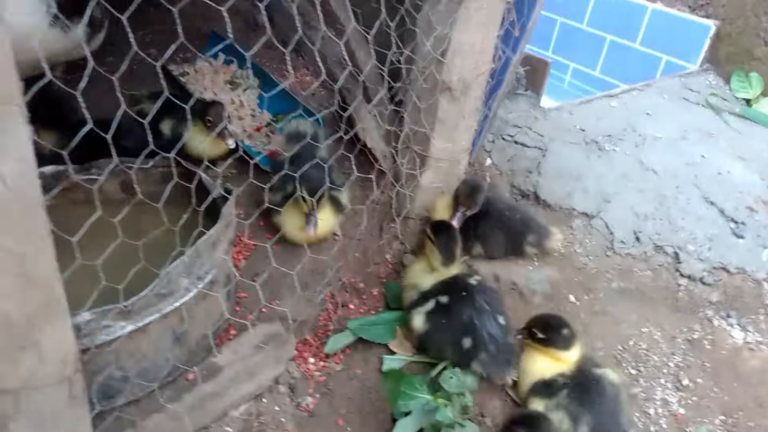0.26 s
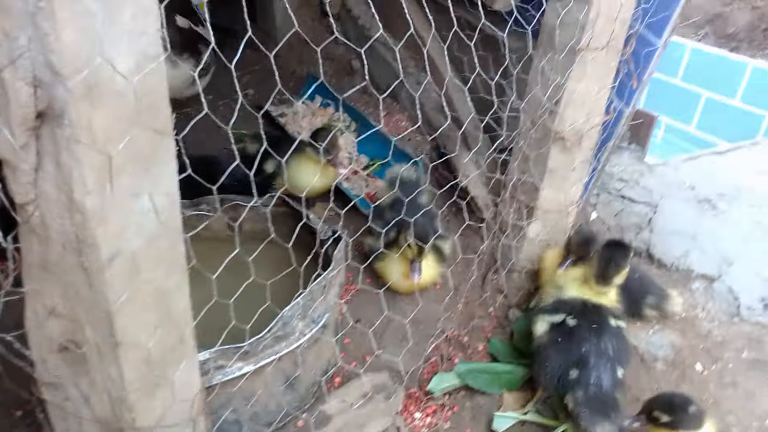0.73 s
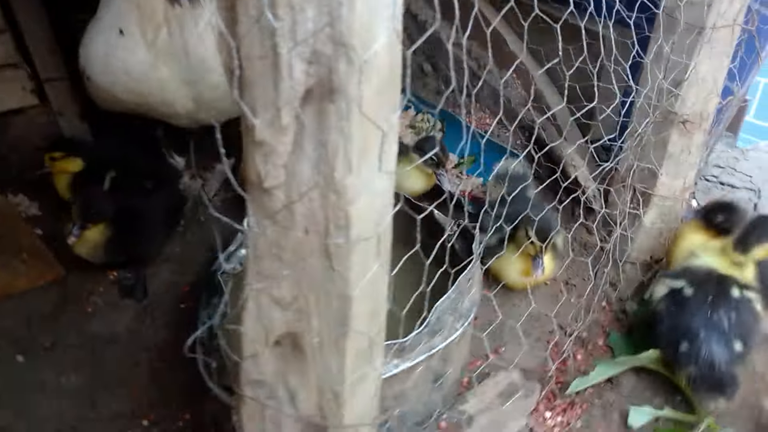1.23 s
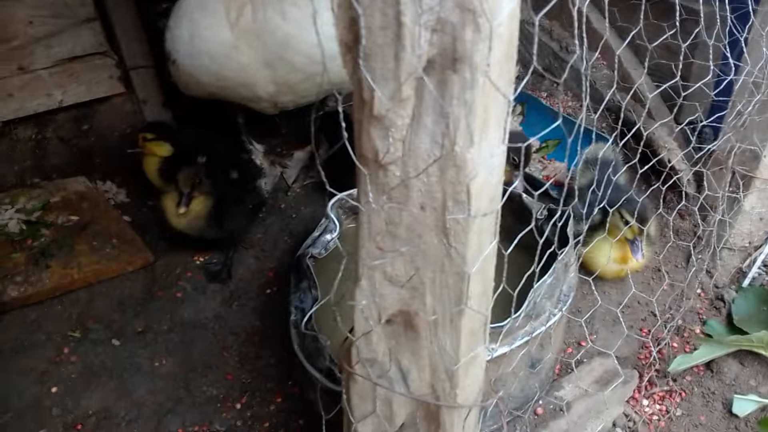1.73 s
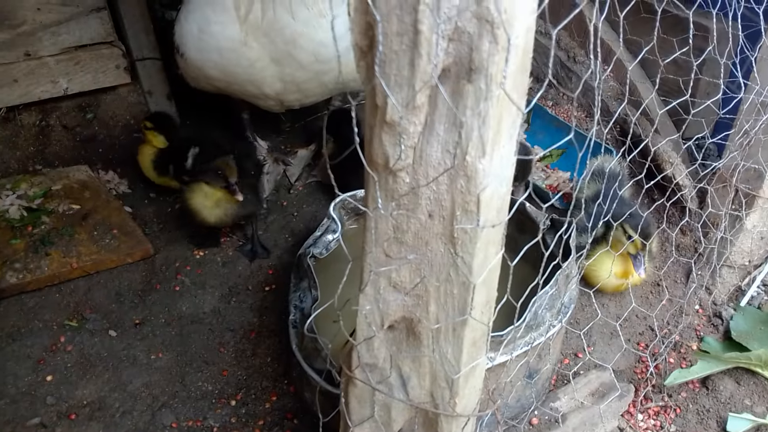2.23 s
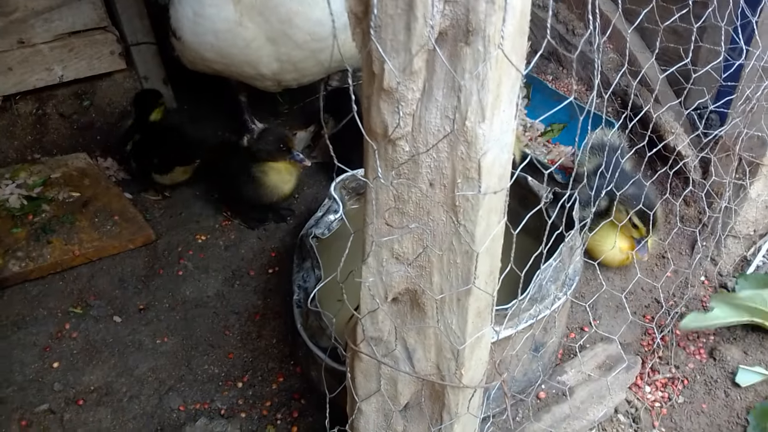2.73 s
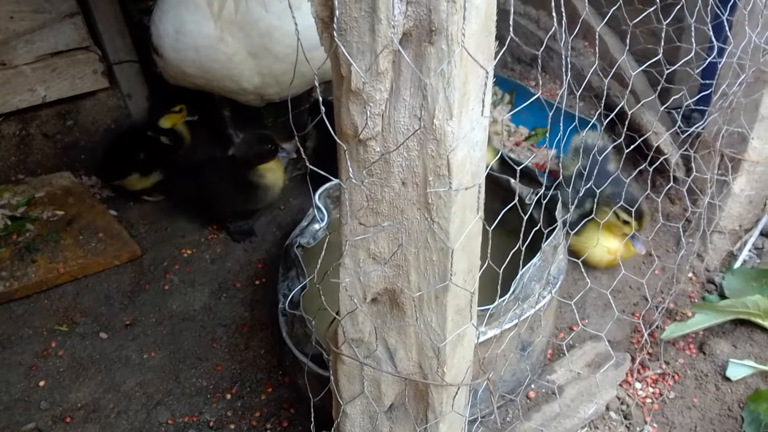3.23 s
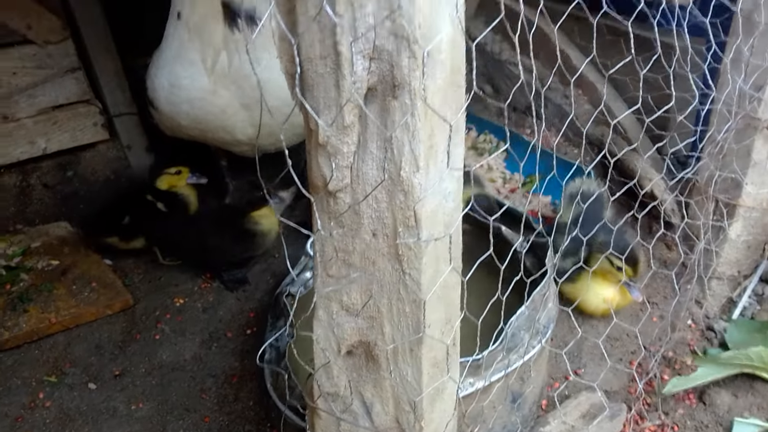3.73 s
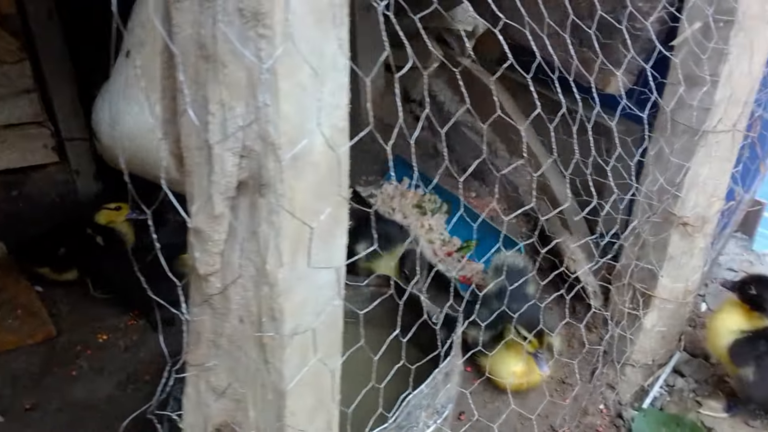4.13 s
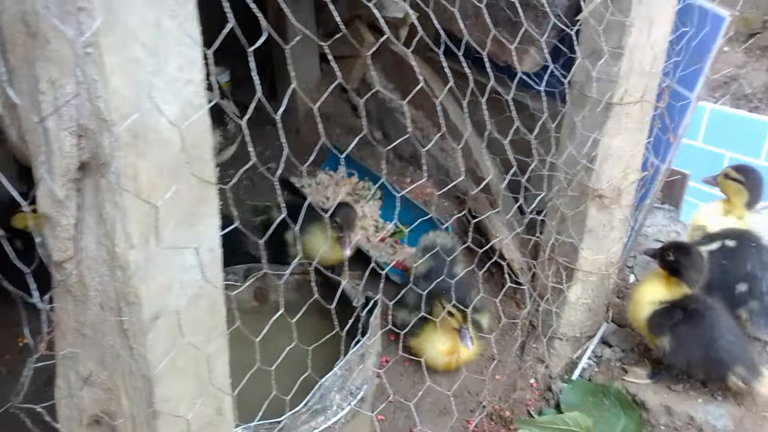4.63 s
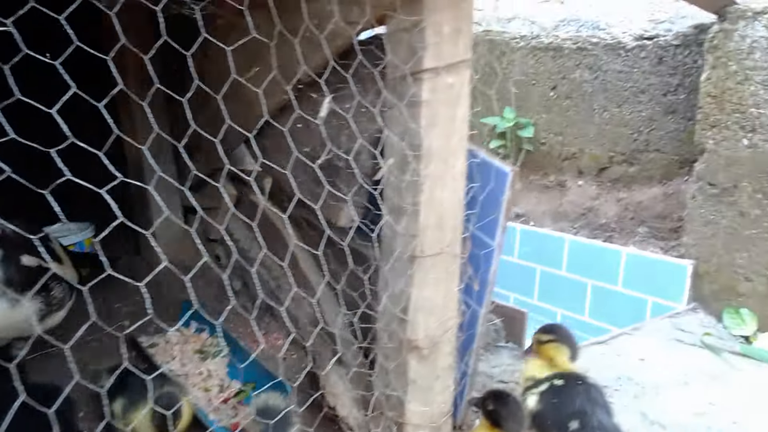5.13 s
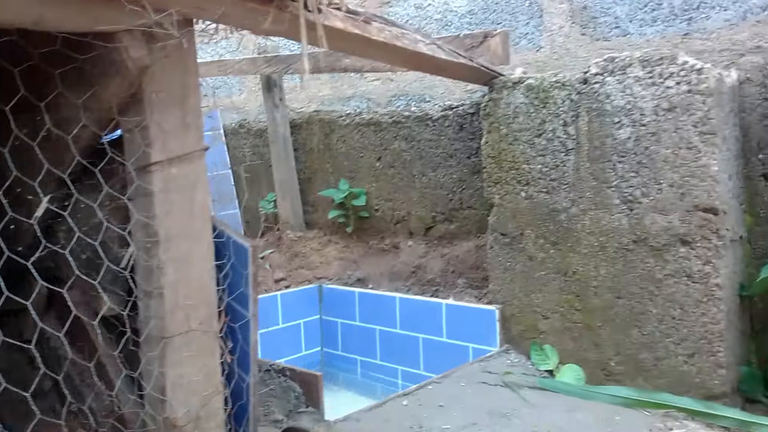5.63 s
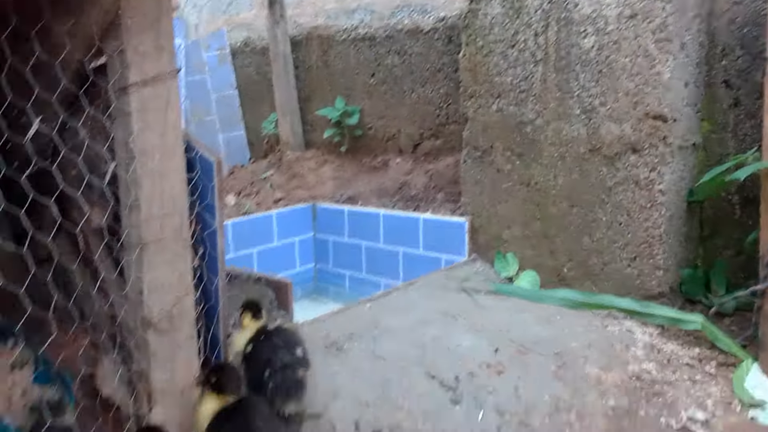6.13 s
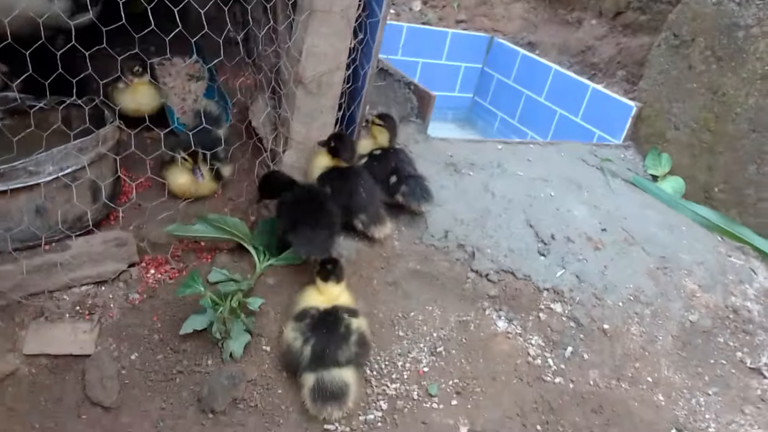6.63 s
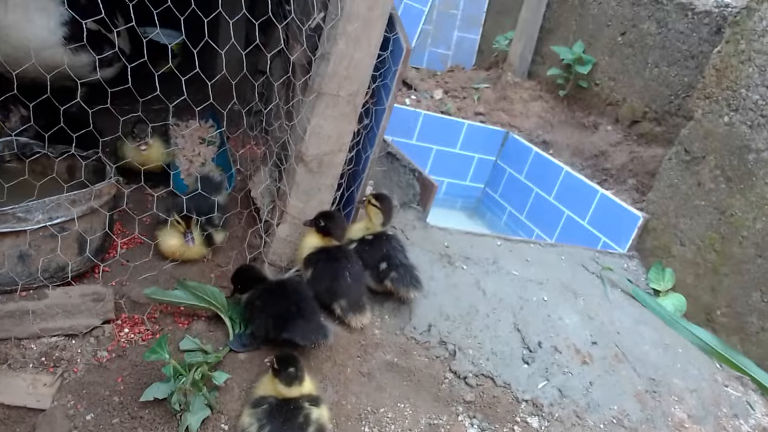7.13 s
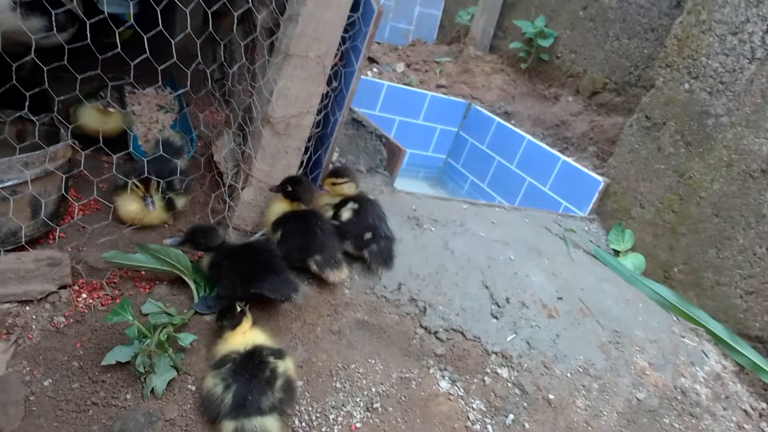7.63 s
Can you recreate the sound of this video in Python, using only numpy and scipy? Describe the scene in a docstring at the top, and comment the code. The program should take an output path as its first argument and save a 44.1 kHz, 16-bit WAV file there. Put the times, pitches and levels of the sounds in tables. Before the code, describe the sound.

Loud grainy handling rubs and snapping clicks come in bursts, with tiny duckling peeps, a rapid faint insect trill and one soft low cluck between.

```python
"""Ducklings and a shifting grip

Ducklings peep faintly (gliding whistles) in a backyard pen while an insect (ringing noise pulses)
chirps on a nearly steady beat, and once a low cluck sounds close by. The hand holding the phone shifts
its grip: skin drags over the case (grainy noise) and the case ticks (short rings).
Fingers near the microphone port lift the hiss around its resonance."""
import sys
import numpy as np
from scipy import signal
from scipy.fft import rfft, irfft, next_fast_len
from scipy.io import wavfile
from scipy.ndimage import uniform_filter1d, map_coordinates

SR = 44100
rng = np.random.default_rng(int(sys.argv[2]) if len(sys.argv) > 2 else 0)


def unload_wav(signal):
    """Save mono or channel-first audio to the path in sys.argv[1] as 16-bit WAV at rate SR, clipped to [-1, 1]."""
    wavfile.write(
        sys.argv[1],
        SR,
        np.round(np.clip(np.atleast_2d(signal).T, -1, 1) * 32767).astype(np.int16),
    )


N = 347508

# Colour of the yard noise: pitch_hz, relative_level_db
YARD_COLOUR = [(15, -40), (45, -0.5), (110, -6.5), (167, -29.5), (230, -10), (400, -11.5), (700, -16.5),
               (2000, -21.5), (4500, -23.5), (7300, -24.5), (9400, -22), (10400, -23.5), (11500, -16),
               (13600, -25), (15800, -25), (16500, -42.5)]
YARD_DB = -71.5

# Dry rustles in the pen: start_s, hold_s, level_db
RUSTLES = [(2.78, 0.039, -64), (3.93, 0.05, -65), (5.26, 0.12, -74)]
# Level of the continuous mid-range rustling hiss, strongest at first and fading late: time_s, level_db
RUSTLING_HISS = [(.2, -52.5), (.7, -63.5), (.85, -70), (1.95, -68), (2.1, -81.5), (6.3, -76.5),
                 (6.6, -92.5), (7.88, -96.5)]
# Colour of the rustles and the rustling hiss: pitch_hz, relative_level_db
LITTER_COLOUR = [(1200, -29), (2200, -4), (3500, -10), (5500, -1), (7000, 2), (9000, -25)]
RUSTLE_RISE, RUSTLE_FALL = [340], [570]  # dB per second

# Something hollow drags in the pen (one row): start_s, hold_s, level_db
SCRAPE = (5.275, 0.12, -66.5)
# Resonances of the hollow object: pitch_hz, width_hz, level_db
HOLLOW = [(742, 90, -2), (1350, 150, -4), (2185, 210, -1), (5400, 390, -6.5)]

# Loudness of the insect: time_s, level_db
INSECT_LEVEL = [(1.3, -81), (2.0, -71.5), (3.2, -71), (5.6, -72), (6.5, -74), (7.2, -95)]
# Beat of the insect: time_s, chirps_so_far
INSECT_BEAT = [(0, -.07), (3.2, 35.34), (5.6, 61.9), (6.45, 71.0), (7.9, 87.05)]
# Wing strokes in one chirp: place_cycles, width_cycles, level_db
STROKES = [(-.16, 0.06, -5), (0.04, 0.07, 1)]
# Resonances of the wing: pitch_hz, width_hz, level_db
WING = [(5800, 700, -1), (6250, 600, 0)]

# Peeps: start_s, length_s, start_pitch_hz, glide_pitch_hz, level_db
PEEPS = [(1.967, 0.037, 3080, 2380, -62), (2.079, 0.056, 3700, 2400, -56), (2.5, 0.032, 2750, 2450, -68),
         (2.569, 0.038, 2640, 3200, -68), (3.349, 0.028, 2900, 2280, -66), (3.474, 0.032, 3250, 2380, -63),
         (3.529, 0.032, 2600, 2100, -71), (3.66, 0.039, 2950, 2100, -67), (3.777, 0.025, 3100, 2550, -74),
         (3.839, 0.03, 2550, 3100, -66), (3.981, 0.036, 3500, 2400, -60), (4.39, 0.03, 2450, 2600, -73),
         (4.428, 0.04, 2700, 3200, -69), (4.479, 0.05, 2680, 3150, -61), (4.552, 0.045, 2650, 3450, -63),
         (4.626, 0.044, 2780, 3600, -61)]
# Swell inside each peep, added to its level: share_of_length, change_db
PEEP_SWELL = [(0, -7), (.45, 1), (1, -8)]
# A rising peep climbs for this share of its length, then drops to this part of its top pitch
RISE_SHARE, DROP_TO = .62, .76
FULL_S = .034  # a rising peep this short or shorter (seconds) stops before its drop

# Soft low cluck close by: time_s, pitch_hz, level_db
CLUCK = [(4.825, 344.3, -54), (4.85, 447.6, -55), (4.869, 402, -32.5), (4.884, 303, -48), (4.919, 242, -51),
         (4.94, 250, -65.5)]

# The hand sweeps along the case: start_s, hold_s, level_db
SWEEPS = [(7.672, 0.03, -64.5), (7.805, 0.0309, -53.5), (7.85, .03, -48)]
# Colour of the sweeping rush: pitch_hz, relative_level_db
SWEEP_COLOUR = [(1300, -8), (2050, -1), (2550, -8), (3300, -1), (5200, -8.5), (7000, -24.5)]

# The hand resting on the case between rubs: time_s, palm_drag_db, port_hiss_db
HAND = [(0, -59, -58), (.45, -53, -60.5), (.66, -61, -52.5), (.84, -67, -62), (1.2, -58.5, -66.5),
        (1.24, -46, -30.5), (1.45, -63.5, -48), (1.58, -72.5, -68.5), (1.85, -73.5, -66.5),
        (2.15, -91, -80), (4.05, -86, -86), (4.2, -64, -58), (4.45, -101, -72), (4.75, -77, -79),
        (4.93, -63, -77), (5.1, -84.5, -89), (5.81, -104, -91), (5.85, -46, -82), (5.9, -56, -54.5),
        (6.05, -54.5, -55.5), (6.3, -72, -64), (6.5, -85.5, -67.5), (7.48, -79.5, -71.5),
        (7.88, -41.5, -74)]
FINGER_REST_DB = -5  # fingers compared with the palm between rubs
# Rubs of skin on the case: start_s, hold_s, palm_db, finger_db, scratch_db
RUBS = [(.033, .08, -44.5, -45, -35), (.16, 0.022, -48, -46, -67.5), (.179, 0.007, -51, -67, -26),
        (.192, 0.0041, -60, -66, -30), (.21, 0.11, -48, -52.5, -57.5), (.244, 0.0074, -36.5, -54.5, -54.5),
        (.312, 0.028, -38.5, -45.5, -55.5), (.376, 0.031, -39, -35, -50), (.54, .065, -37, -30, -44),
        (.61, 0.09, -65, -54.5, -48), (.915, 0.015, -67, -66.5, -50.5), (1.056, 0.03, -51, -45.5, -78),
        (1.136, 0.039, -61, -41.5, -64.5), (1.211, 0.014, -36.5, -34.5, -55.5),
        (1.227, 0.0032, -46, -37, -15.5), (1.266, 0.0037, -47.5, -40.5, -14),
        (1.295, 0.003, -48, -46.5, -25.5), (1.337, 0.0038, -43, -47.5, -23), (1.35, 0.031, -50, -52, -34.5),
        (1.41, 0.04, -56.5, -60.5, -52), (1.51, 0.0084, -49.5, -64, -62), (1.6, .14, -94, -71.5, -55.5),
        (4.108, 0.0079, -53, -59, -60.5), (4.168, 0.024, -52.5, -60.5, -55),
        (4.543, 0.016, -56.5, -55, -54.5), (4.57, 0.097, -66, -87, -58.5), (4.86, 0.033, -47.5, -89, -77),
        (5.823, 0.002, -41.5, -40, -62.5), (5.886, 0.014, -52, -40.5, -42.5), (5.914, .004, -35, -35, -40),
        (5.924, 0.016, -29, -39.5, -42), (5.985, .003, -43.5, -56, -53.5), (5.996, 0.014, -31, -32.5, -43),
        (6.058, 0.0025, -40, -55.5, -69), (6.108, 0.0049, -50.5, -60, -76),
        (6.235, 0.04, -55, -67.5, -57.5), (6.375, 0.0033, -51.5, -62, -74), (6.61, 0.03, -66.5, -67, -56.5),
        (6.78, 0.0101, -65, -65, -59.5), (7.032, 0.008, -61, -64.5, -56.5), (7.59, 0.0375, -57.5, -89, -77),
        (7.659, 0.087, -46, -65.5, -76), (7.745, 0.19, -40.5, -74, -72), (7.81, 0.067, -39, -44.5, -59)]
RUB_RISE, RUB_FALL = [930, 710, 900], [860, 900, 2000]  # dB per second: palm, fingers, scratch
# A burst that starts this close to a tick sets in almost at once (dB per second, seconds)
SNAP_RISE, SNAP_WITHIN_S = 9000, .008
# Colour of the palm drag: pitch_hz, relative_level_db
PALM_COLOUR = [(40, -59), (110, -18), (165, -33.5), (220, -9.5), (350, -5.5), (600, -7.5), (1250, -21),
               (2000, -59.5)]
# Colour of the finger rub: pitch_hz, relative_level_db
FINGER_COLOUR = [(400, -32), (650, 3), (1100, 3), (2100, -1.5), (2900, -12.5), (4500, -24.5), (6500, -55.5)]
# Colour of the fine scratch: pitch_hz, relative_level_db
SCRATCH_COLOUR = [(1650, -31), (3300, -9), (3750, -13), (4300, -6.5), (5100, -15), (7500, -3.5),
                  (10500, -10.5), (16000, -29.5)]
# Colour of the hiss at the microphone port: pitch_hz, relative_level_db
PORT_COLOUR = [(5500, -33.5), (6800, -12.5), (8200, -2.5), (9600, -7), (10400, -11), (11600, -7),
               (13500, -15), (16500, -31.5)]
# Fingers cover the port more or less and move its resonance: time_s, pitch_hz
COVER = [(0, 8130), (.18, 7856), (.35, 6496), (.62, 8410), (.87, 8004), (1.27, 9594), (1.45, 7710),
         (4.2, 8150), (4.62, 9060), (6.1, 8285), (7.1, 9200), (7.88, 8080)]
COVER_WIDTH_HZ = 930

# Ticks of the case, levels before the fixed boosts in ticks(): time_s, level_db, thud_over_tick_db, ring_hz
TICKS = [(0.1778, -9.5, -38, 8100), (0.245, -48, -11, 1010), (0.454, -44, -22, 2500),
         (0.576, -9.5, -37.5, 1600), (.605, -16.5, -34, 8300), (0.7464, -17, -56, 1970),
         (0.7629, -24.5, -42, 8400), (.8867, -36, -14.5, 1850), (0.9255, -20.5, -12.5, 1230),
         (1.2097, -53, 4.5, 1900), (1.226, 6.5, -42, 9800), (1.2456, -14.5, -43, 8300),
         (1.2651, -2.5, -42, 9700), (1.2808, -15.5, -34.5, 9600), (1.295, -20, -26, 8700),
         (1.3153, -12, -40, 9600), (1.3367, -9, -50, 8500), (1.3828, -33, -35, 7750), (1.519, -41, 0, 1080),
         (1.6392, -26.5, -41, 8300), (1.7018, -24.5, -48, 7760), (1.8015, -32.5, -45, 8150),
         (1.872, -46.5, -9, 1023), (2.2845, -36, -41, 5290), (2.4864, -39, -41, 5330),
         (3.1018, -45.5, -34.5, 2410), (3.2386, -40, -35, 6500), (3.314, -55.5, -30, 2600),
         (3.815, -54.5, -7.5, 1386), (3.885, -45.5, -13.5, 3530), (4.031, -57, -7, 1210),
         (4.151, -34, -11, 1890), (4.1514, -20, -36, 8200), (4.1712, -28.5, -7, 1710),
         (4.1717, -20.5, -38, 8050), (4.1774, -21, -41, 8250), (4.2167, -44.5, 1.5, 1630),
         (4.218, -36, -40, 8700), (4.2545, -34, -40, 9200), (4.5268, -34.5, -9, 2190),
         (4.541, -31, 6, 1270), (5.254, -44, -31, 5030), (5.53, -51, -24, 1592), (5.8236, -7, -51, 4300),
         (5.8382, -17, -43, 1780), (5.89, -23, -32, 2200), (5.897, -4.5, -30.5, 6740),
         (5.9037, -14.5, -32, 2040), (5.9051, -14.5, -44, 8600), (5.9239, -24, -1, 3660),
         (5.9245, -11, -45.5, 9100), (6.0081, -16.5, -15, 2020), (6.0087, -11.5, -42, 8700),
         (6.017, -18.5, -33, 9400), (6.0594, -29, -0.5, 1400), (6.0705, -31, -40, 8600),
         (6.096, -48.5, -30, 3500), (6.172, -30, -34, 8100), (6.189, -42, -5.5, 4020),
         (6.1959, -19, -25.5, 8850), (6.2243, -43.5, 5.5, 2980), (6.2237, -23, -40, 8600),
         (6.2901, -41.5, -40, 8700), (6.327, -52.5, -32, 3960), (7.659, -54, 17, 998)]
# Low modes of the phone in the hand: pitch_hz, width_hz, level_db
CASE = [(383.3, 43, -0.5), (780, 67, -6.5)]
RATTLE_DB = -16.5  # rattle after a tick, compared with its slip
RING_WIDTH, UPPER_RATIO, UPPER_DB = 0.39, 3.1, -5  # width over pitch; second mode: pitch ratio, level

TOP_HZ = 16600


def amp(db):
    """Turn decibels into a gain."""
    return 10 ** (np.asarray(db) / 20)


def unit(x):
    """Scale to an average strength (rms) of 1."""
    return x / np.sqrt(np.mean(x ** 2) + 1e-20)


def curves(rows):
    """Draw straight lines between rows: one value per sample for each column after the time."""
    s, *columns = np.transpose(rows)
    return [np.interp(np.arange(N) / SR, s, column) for column in columns]


def wobble(rate):
    """A smooth random curve with this many random points a second."""
    points = rng.standard_normal(int(N * rate / SR) + 4)
    return map_coordinates(points, [np.arange(N) * rate / SR])


def filtered(x, response):
    """Change the strength and phase of each frequency in x."""
    m = next_fast_len(N + SR // 2)  # spare room so that rings do not wrap around
    return irfft(rfft(x, m) * response(np.fft.rfftfreq(m, 1 / SR)), m)[..., :N]


def modes(table):
    """Response of a set of resonances that ring after each push, with alternating signs."""
    def response(f):
        total = 0
        for k, (center, width, db) in enumerate(table):
            resonance = 1j * f * width / (center * center - f * f + 1j * f * width)
            total = total + (-1) ** k * amp(db) * resonance
        return total
    return response


def grainy(colour, rate, grain_db, patchy_db, port_db=0, size=256):
    """Coloured noise of rms 1 whose source slips unevenly, favours shifting bands and rings the port."""
    f, db = np.transpose(colour)
    grains = amp(grain_db * wobble(rate)) * rng.standard_normal(N)
    hz, t, z = signal.stft(grains, SR, nperseg=size)
    # Random band levels, smoothed over neighbouring bands and then over time
    bands = uniform_filter1d(rng.standard_normal(z.shape), size=2, axis=0)
    bands = uniform_filter1d(bands, size=7680 // size, axis=1)
    port_hz = np.interp(t, *np.transpose(COVER))
    port = np.exp(-.5 * ((hz[:, None] - port_hz) / COVER_WIDTH_HZ) ** 2)
    shaped = z * amp(patchy_db * unit(bands) + port_db * port)
    slips = signal.istft(shaped, nperseg=size)[1][:N]
    return unit(filtered(slips, lambda hz: amp(np.interp(np.log(hz + 1), np.log(f), db))))


def bursts(rows, rise, fall):
    """Power of each level column: every row sets in, holds and dies away at a steady dB rate."""
    t, power = np.arange(N) / SR, 1e-14
    for s, hold, *db in rows:
        snaps = min(abs(s - tick[0]) for tick in TICKS) < SNAP_WITHIN_S
        onset = np.outer(np.maximum(rise, snaps * SNAP_RISE), np.maximum(s - t, 0))
        under_db = onset + np.outer(fall, np.maximum(t - s - hold, 0))
        power = power + amp(2 * np.array(db))[:, None] * amp(-2 * np.minimum(under_db, 150))
    return power


def yard():
    """Distant neighbourhood hum and the microphone's own hiss, made as one coloured noise."""
    return amp(YARD_DB) * grainy(YARD_COLOUR, rate=8, grain_db=.6, patchy_db=1)


def rustle():
    """Grainy noise in dry bursts over a continuous mid-range hiss that is strongest at the start."""
    power = bursts(RUSTLES, RUSTLE_RISE, RUSTLE_FALL)[0] + amp(curves(RUSTLING_HISS)[0]) ** 2
    return np.sqrt(power) * grainy(LITTER_COLOUR, rate=120, grain_db=2.5, patchy_db=3)


def scrape():
    """Dragging grit rings a hollow object."""
    grit = amp(1.6 * wobble(100)) * rng.standard_normal(N)
    level = np.sqrt(bursts([SCRAPE], RUSTLE_RISE, RUSTLE_FALL)[0])
    return level * unit(filtered(grit, modes(HOLLOW)))


def insect():
    """Two wing strokes a chirp over a thin steady whirr; the teeth of the file ring the wing unevenly."""
    place = (curves(INSECT_BEAT)[0] + .5) % 1 - .5  # position in the chirp cycle, -0.5 to 0.5
    strokes = amp(-13)  # the whirr
    for at, width, db in STROKES:
        strokes = strokes + amp(db) * np.exp(-.5 * ((place - at) / width) ** 2)
    rung_once = filtered(rng.standard_normal(N), modes(WING))
    teeth = unit(filtered(rung_once, modes(WING)))
    return amp(curves(INSECT_LEVEL)[0] + 2.2 * wobble(14)) * strokes * teeth


def ducklings():
    """Each peep is a gliding whistle with a weak octave and a slight tremble, echoed by the pen."""
    out, tremble = np.zeros(N), wobble(220)
    for s, length, from_hz, to_hz, db in PEEPS:
        n = np.arange(round(s * SR), round((s + length) * SR))
        share = np.linspace(0, 1, len(n))
        if to_hz > from_hz:
            end_hz = DROP_TO * to_hz if length > FULL_S else to_hz
            hz = np.interp(share, [0, RISE_SHARE, 1], [from_hz, to_hz, end_hz])
        else:
            hz = from_hz + (to_hz - from_hz) * share ** 1.25
        turn = 2 * np.pi * np.cumsum(hz * (1 + .016 * tremble[n])) / SR
        swell_db = np.interp(share, *np.transpose(PEEP_SWELL))
        edge = signal.windows.tukey(len(n), .25) * amp(db + swell_db)
        whistle = amp(2 * tremble[n]) * (np.sin(turn) + amp(-18) * np.sin(2 * turn))
        out[n] += np.sqrt(2) * edge * whistle
    t = np.arange(SR // 8) / SR
    pen = rng.standard_normal(len(t)) * amp(-60 * t / 0.05)  # echo falls 60 dB in 0.05 s
    echo = signal.fftconvolve(out, pen / np.linalg.norm(pen))[:N]
    return out + amp(-5) * echo


def cluck():
    """A muffled note that rises briefly, then falls, with two overtones and an unsteady pitch."""
    hz, db = curves(CLUCK)
    start, end = CLUCK[0][0], CLUCK[-1][0]
    sounding = np.interp(np.arange(N) / SR, [start - .004, start, end, end + .004], [0, 1, 1, 0])
    turn = 2 * np.pi * np.cumsum(hz * (1 + 0.0349 * wobble(98))) / SR
    voice = np.sin(turn) + amp(-10.0) * np.cos(2 * turn) + amp(-25) * np.sin(3 * turn)
    return np.sqrt(2) * sounding * amp(db) * voice


def sweeps():
    """Skin slides fast along the case and makes a broad rush of fine slips."""
    level = np.sqrt(bursts(SWEEPS, RUSTLE_RISE, RUSTLE_FALL)[0])
    return level * grainy(SWEEP_COLOUR, rate=200, grain_db=3, patchy_db=3)


def grip():
    """Skin sticks and slips on the case: slow lumps under the palm, finer grains under the fingers."""
    drag_db, hiss_db = curves(HAND)
    resting = amp([drag_db, drag_db + FINGER_REST_DB, hiss_db]) ** 2
    palm_db, finger_db, scratch_db = 10 * np.log10(resting + bursts(RUBS, RUB_RISE, RUB_FALL))
    palm = amp(palm_db) * grainy(PALM_COLOUR, rate=60, grain_db=2.2, patchy_db=3, size=1024)
    fingers = amp(finger_db) * grainy(FINGER_COLOUR, rate=150, grain_db=3, patchy_db=3.5, size=512)
    # A light touch mostly sounds the port, a hard one the whole case
    hard = 1 / (1 + amp(2.5 * (-55 - scratch_db)))
    rasp = grainy(SCRATCH_COLOUR, rate=500, grain_db=3.5, patchy_db=4, port_db=7)
    hiss = grainy(PORT_COLOUR, rate=250, grain_db=1.5, patchy_db=2.5, port_db=7)
    scratch = amp(scratch_db) * (np.sqrt(hard) * rasp + np.sqrt(1 - hard) * hiss)
    # Stray grit lets go more often under a hard touch; its strength follows the scratch within limits
    lets_go = rng.random(N) < (24 + 90 * hard) / SR
    grit = lets_go * amp(rng.normal(0, 4, N))
    grit_level = amp(np.clip(scratch_db, -72, -36) + 19)
    specks = filtered(grit * grit_level, modes([(3500, 3000, -3), (8300, 3000, 0)]))
    return palm + fingers + scratch + specks


def ring(t, hz, width_hz):
    """A struck spot rings at one pitch; a wider resonance dies sooner."""
    return np.exp(-np.pi * width_hz * t) * np.sin(2 * np.pi * hz * t)


def ticks():
    """One sharp slip rings its spot on the shell, pushes the low modes and leaves a short rattle."""
    out, pushes, t = np.zeros(N + SR), np.zeros(N), np.arange(SR // 40) / SR
    shakes = rng.standard_normal((len(TICKS), len(t)))
    for (s, db, thud_db, hz), shake in zip(TICKS, shakes):
        n = round((s + .001) * SR)  # the slip comes 1 ms after the listed time
        slip = amp(RATTLE_DB - 60 * t / 0.0083) * shake
        slip[0] = 1
        upper_hz = min(UPPER_RATIO * hz, 11000)
        upper = amp(UPPER_DB) * ring(t, upper_hz, 0.85 * upper_hz)
        shell = ring(t, hz, RING_WIDTH * hz) - upper
        out[n:n + len(t)] += amp(db + 4) * signal.fftconvolve(slip, shell)[:len(t)]
        pushes[n] = amp(db + thud_db + 40.5)
    # Soften the shell sound below 500 Hz and above 9000 Hz
    shells = filtered(out[:N], lambda f: 1j * f / (500 + 1j * f) / (1 + 1j * f / 9000))
    return shells + filtered(pushes, modes(CASE))


def scene():
    """Everything adds up at one microphone."""
    background = yard() + rustle() + scrape() + insect()
    birds = ducklings() + cluck()
    handling = sweeps() + grip() + ticks()
    return (background + birds + handling)[None]


def record(dry):
    """The loudest snaps are rounded off; nothing is kept above the band limit."""
    rounded = dry / (1 + np.abs(dry / .62) ** 4) ** .25
    return filtered(rounded, lambda hz: hz < TOP_HZ)


dry = scene()
out = record(dry)
unload_wav(out)
```